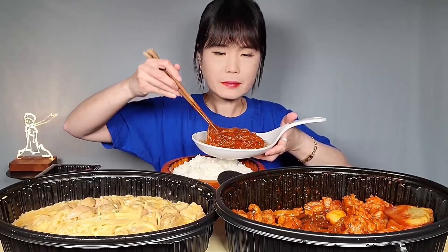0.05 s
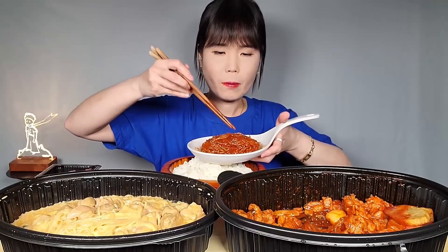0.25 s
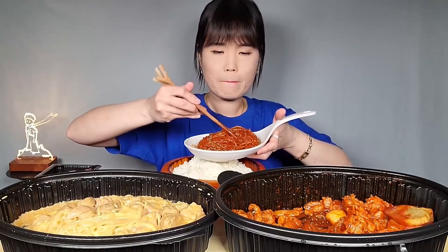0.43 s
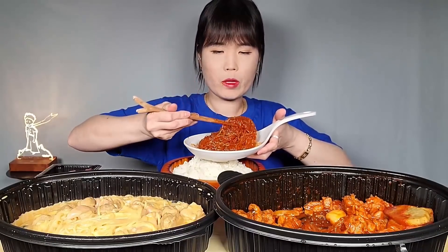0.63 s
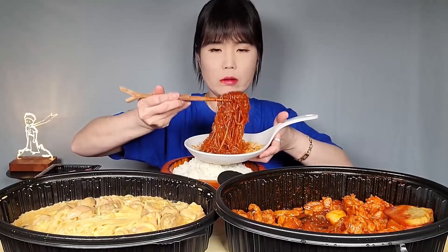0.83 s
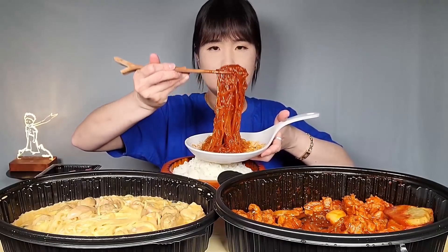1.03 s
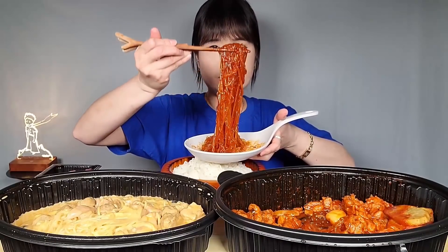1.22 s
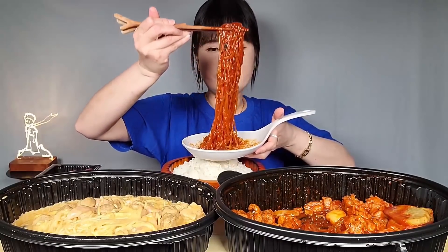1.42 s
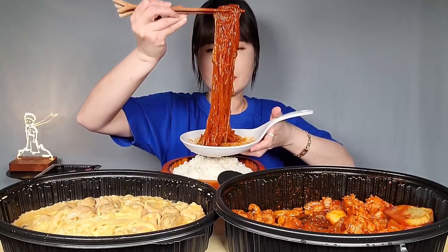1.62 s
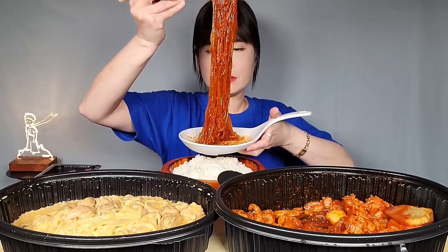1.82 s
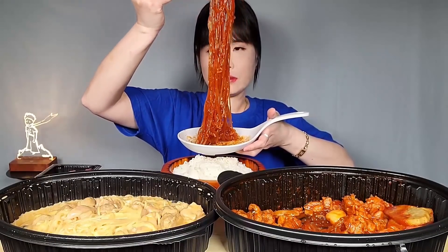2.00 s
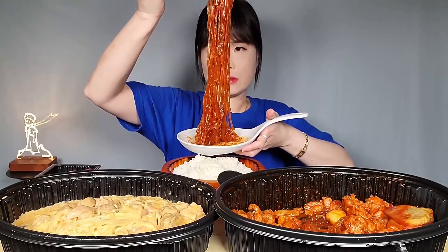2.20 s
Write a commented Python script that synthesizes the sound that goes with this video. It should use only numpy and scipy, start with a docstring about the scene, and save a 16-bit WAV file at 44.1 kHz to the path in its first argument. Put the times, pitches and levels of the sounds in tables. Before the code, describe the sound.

Saucy noodles squelch and crackle wetly as chopsticks gather and lift them, close up.

```python
"""Lifting saucy noodles

Chopsticks gather noodles in a ceramic spoon and lift them, close to a stereo microphone in a quiet room.
Sauce films burst in tiny pops over a fine crackle; air pockets plip open as the strands pull apart.
The sticks nudge the food and tick once on the spoon. A sleeve rustles and the microphone stand sways."""
import sys
import numpy as np
from scipy import signal
from scipy.fft import rfft, irfft
from scipy.io import wavfile
from scipy.ndimage import uniform_filter1d

SR = 44100
rng = np.random.default_rng(int(sys.argv[2]) if len(sys.argv) > 2 else 0)


def pcm_store(signal):
    """Save signal as 16-bit PCM."""
    levels = np.round(np.clip(np.atleast_2d(signal), -1, 1) * 32767)
    wavfile.write(sys.argv[1], SR, levels.astype(np.int16).T)


N = 103635


def amp(db):
    return 10 ** (np.asarray(db) / 20)


def unit_rms(x):
    return x / np.sqrt(np.mean(x ** 2) + 1e-20)


def fader(table, column=1):
    """A gain for every sample, gliding between timed levels in dB."""
    rows = np.array(table)
    return amp(np.interp(np.arange(N) / SR, rows[:, 0], rows[:, column]))


def at_freq(points, hz):
    """Reads a table along a log-frequency axis."""
    freqs, values = np.transpose(points)
    return np.interp(np.log(hz + 1), np.log(freqs), values)


def add(mix, start_s, sound):
    """Mixes a sound in at its cue."""
    part = mix[..., max(round(start_s * SR), 0):][..., :sound.shape[-1]]
    part += sound[..., :part.shape[-1]]


def eq(x, gain_db):
    """Filters by a function that gives dB for each frequency."""
    size = 2 * x.shape[-1]
    hz = np.fft.rfftfreq(size, 1 / SR) + 1
    return irfft(rfft(x, size) * amp(gain_db(hz)))[..., :size // 2]


def bell(x, centre_hz, db_per_oct2):
    """Keeps a bell-shaped band, at unit RMS."""
    return unit_rms(eq(x, lambda hz: -db_per_oct2 * np.log2(hz / centre_hz) ** 2))


def delayed(x, lag_s):
    """Delays with sub-sample precision."""
    size = 2 * len(x)
    hz = np.fft.rfftfreq(size, 1 / SR)
    return irfft(rfft(x, size) * np.exp(-2j * np.pi * hz * lag_s))[:len(x)]


# Colour of the room tone and hiss: freq_hz, gain_db
ROOM_TONE_EQ = [(60, -3.5), (250, -12), (400, -18), (1600, -28), (7400, -30.5), (10000, -34), (13200, -25),
                (16000, -32)]
def room_tone(level_db=-50):
    """A steady bed of room air and microphone hiss, mostly unrelated between the sides."""
    noise = rng.standard_normal((2, N)) + 0.39 * rng.standard_normal(N)
    return amp(level_db) * unit_rms(eq(noise, lambda hz: at_freq(ROOM_TONE_EQ, hz)))


# Early reflections off the dishes and table: freq_hz, t60_s
TABLE_DECAY = [(500, 0.068), (12000, 0.0085)]
# The room's tail: freq_hz, t60_s
ROOM_DECAY = [(300, 1), (3000, 0.052), (12000, 0.16)]
def reflections(send, size=16384):
    """The table, then the room, answer with diffuse stereo tails that last longest in the lows."""
    wet = np.zeros((2, N))
    for decay, level_db, predelay_s in [(TABLE_DECAY, -8, 0.0005), (ROOM_DECAY, -23, 0.005)]:
        hz, t, noise = signal.stft(rng.standard_normal((2, size)), SR, nperseg=64)
        fade = amp(-60 * t / at_freq(decay, hz)[:, None])
        tail = signal.istft(noise * fade, SR, nperseg=64)[1]
        tail = np.pad(tail / np.linalg.norm(tail[0]), ((0, 0), (round(predelay_s * SR), 0)))
        wet += amp(level_db) * signal.fftconvolve(send[None], tail, axes=1)[:, :N]
    return wet


# Handling rumble in the stand: time_s, sub_level_db, bass_level_db
RUMBLE_LEVELS = [(.25, -62.5, -51.5), (.34, -24.5, -48), (.47, -34.5, -49), (.6, -35.5, -51),
                 (1.1, -39, -60.5), (1.7, -46.5, -62.5), (2.12, -45.5, -43), (2.35, -49, -53)]
def mic_stand(push_s=0.266, sway_hz=14.8, sway_db=-12.5, swell_s=0.215):
    """The movement rocks the stand from side to side; the sway swells and dies over a low rumble."""
    sway, t = np.zeros((2, N)), np.arange(N) / SR
    swell = amp(sway_db) * (t / swell_s * np.exp(1 - t / swell_s)) ** 5
    left = amp(-2.5) * np.sin(2 * np.pi * (sway_hz * t - 0.37))
    right = np.sin(2 * np.pi * sway_hz * t)
    add(sway, push_s, swell * np.array([left, right]))
    sub = bell(rng.standard_normal((2, N)), centre_hz=23, db_per_oct2=23)
    bass = bell(rng.standard_normal((2, N)) + rng.standard_normal(N), centre_hz=51, db_per_oct2=17)
    return sway + sub * fader(RUMBLE_LEVELS) + bass * fader(RUMBLE_LEVELS, column=2)


# Swell of the sleeve's rustle: time_s, level_db
SLEEVE_LEVELS = [(.7, -63.5), (.85, -49), (1.3, -51.5), (2.05, -68.5)]
# Colour of the cloth: freq_hz, gain_db
CLOTH_EQ = [(250, 2.5), (480, -12), (850, -3.5), (1700, -13), (12000, -23)]
def sleeve():
    """Cloth rustles softly while the arm lifts the noodles."""
    noise = rng.standard_normal(N) + 0.87 * rng.standard_normal((2, N))
    return fader(SLEEVE_LEVELS) * unit_rms(eq(noise, lambda hz: at_freq(CLOTH_EQ, hz)))


def snap(tilt_db_per_oct=0, decay_s=0.0008, low_hz=1900, high_hz=14700, size=512):
    """The broad crack of a tearing film or a stick's tap: a very short burst of noise."""
    def tone_db(hz):
        tilt = tilt_db_per_oct * np.log2((hz + 400) / 5900)
        return tilt - 10 * np.log10((1 + (hz / high_hz) ** 8) * (1 + (low_hz / hz) ** 4))
    t = np.arange(size) / SR
    burst = rng.standard_normal(size) * np.exp(-t / decay_s)
    return eq(burst / np.linalg.norm(burst), tone_db)


# Soft nudges of the sticks in the food: start_s, length_s, level_db, centre_hz
STICK_NUDGES = [(0, 0.0084, -41, 740), (0.047, 0.034, -48.5, 740), (0.13, 0.012, -36, 1190),
                (0.1823, 0.0064, -39.5, 840), (0.193, 0.013, -37, 810), (0.7442, 0.008, -39, 780)]
# Ring of the ceramic spoon: pitch_hz, relative_level_db, t60_s
SPOON_MODES = [(2140, -14.5, .011), (3360, -5, 0.02), (4800, 1.5, 0.0093), (6150, 4.5, 0.0068),
               (7520, 7, 0.0054)]
def chopsticks(tick_s=0.2151, snap_db=-6, ring_db=-18.5, size=4096):
    """The sticks scuff dully in the food and strike the spoon once, ringing its modes."""
    out, t = np.zeros(N), np.arange(size) / SR
    for start_s, length_s, level_db, centre_hz in STICK_NUDGES:
        scuff = eq(rng.standard_normal(size), lambda hz: -11.5 * np.abs(np.log2(hz / centre_hz)))
        age = 2 * t / length_s  # the scuff peaks at age 1
        add(out, start_s, amp(level_db) * unit_rms(scuff) * (age * np.exp(1 - age)) ** 2)
    add(out, tick_s, amp(snap_db) * snap())
    for pitch_hz, mode_db, t60_s in SPOON_MODES:
        mode = np.sin(2 * np.pi * (pitch_hz * t + rng.random()))
        add(out, tick_s, amp(ring_db + mode_db - 60 * t / t60_s) * mode)
    return out


# Plips between the strands: start_s, level_db
AIR_POCKETS = [(0.7468, -21), (0.8132, -32), (.939, -34.5), (0.9907, -30.5), (1.135, -31), (1.188, -31),
               (1.233, -35), (1.5261, -32), (1.6295, -36.5)]
def air_pockets(pitch_hz=1048, glide_hz_per_s=5800, attack_s=0.00063, decay_s=0.0046, size=2048):
    """Each air pocket rings and rises in pitch as it opens."""
    out, t = np.zeros(N), np.arange(size) / SR
    envelope = (1 - np.exp(-t / attack_s)) * np.exp(-t / decay_s)
    for start_s, level_db in AIR_POCKETS:
        start_hz = pitch_hz * (1 + 0.015 * rng.standard_normal())
        turns = start_hz * t + glide_hz_per_s * t ** 2 / 2
        add(out, start_s, amp(level_db) * envelope * np.sin(2 * np.pi * turns))
    return out


def cavity_ring(pitch_hz, decay_ms, attack_cycles=0.33, size=512):
    """A tiny cavity swells softly and rings for a few cycles."""
    t = np.arange(size) / SR
    attack = (1 - np.exp(-pitch_hz * t / attack_cycles)) ** 2
    return np.sin(2 * np.pi * pitch_hz * t) * attack * np.exp(-1000 * t / decay_ms)


def in_spoon(burst, echo_s=0.00045, echo_db=-6, pad=64):
    """Puts a burst at a random spot: the wall's echo hollows it, and the sides differ slightly in time."""
    left_lag_s = rng.normal(8e-6, 12e-6)
    direct = np.pad(burst, pad)
    echo = amp(echo_db) * delayed(direct, echo_s * rng.uniform(0.49, 2.006))
    hollow = (direct + echo) / np.hypot(1, amp(echo_db))
    return np.array([delayed(hollow, left_lag_s), hollow])[:, pad - 8:]


def crackle(effort, peak_per_s, low_hz, high_hz, ring_cycles, spread_db, tilt_db_per_oct):
    """Small films of random size burst in clumps; with less effort they grow both fewer and softer."""
    out, level = np.zeros((2, N)), fader(effort)
    pitches = np.geomspace(low_hz, high_hz, 32)
    density = np.sqrt(level / level.max())
    flutter = uniform_filter1d(rng.standard_normal(N), round(0.003 * SR))  # clumps of about 3 ms
    clumps = np.exp(0.8 * unit_rms(flutter))
    chance = density * clumps / clumps.mean() * peak_per_s / len(pitches) / SR
    for hz in pitches:
        sizes = amp(spread_db * np.minimum(rng.exponential(1, N), 2.5)) * rng.choice([-1, 1], N)
        triggers = (rng.random(N) < chance) / np.sqrt(density)  # even power until the fader
        bursts = amp(tilt_db_per_oct * np.log2(hz / low_hz)) * sizes * triggers
        ring = cavity_ring(hz, decay_ms=1000 * ring_cycles / hz)
        grain = ring / np.linalg.norm(ring) + amp(-9) * snap()
        out += signal.oaconvolve(bursts[None], in_spoon(grain), axes=1)[:, :N]
    return level * unit_rms(out)


# Fine crackle, following how hard the noodles are worked: time_s, level_db
STRAND_EFFORT = [(0, -49.5), (.08, -56.5), (.26, -48.5), (.375, -57.5), (.41, -41.5), (.47, -36.5),
                 (.525, -45.5), (.595, -41.5), (.645, -36), (.715, -40), (.785, -42.5), (1.02, -48.5),
                 (1.3, -53), (1.46, -53), (2.35, -62)]
# Moist squelch as the mass is squeezed and tears loose: time_s, level_db
SQUEEZE_EFFORT = [(.39, -59), (.47, -37.5), (.51, -44), (.595, -43), (.655, -40), (.79, -49), (.94, -50),
                  (1.15, -60), (1.8, -68)]
def noodles():
    """The strands crackle finely above the lower, bubbly squelch of the squeezed mass."""
    fine = crackle(STRAND_EFFORT, peak_per_s=1200, low_hz=6370, high_hz=14500,
                   ring_cycles=2.3, spread_db=6.5, tilt_db_per_oct=-2.3)
    moist = crackle(SQUEEZE_EFFORT, peak_per_s=1600, low_hz=1274, high_hz=4670,
                    ring_cycles=1.4, spread_db=9, tilt_db_per_oct=3.5)
    return fine + moist


# Bursting sauce films: start_s, level_db, pitch_hz, decay_ms
SAUCE_POPS = [(0.0453, -12, 8100, 0.26), (0.261, -10, 9900, 0.09), (0.436, -8.5, 6950, 0.3),
              (0.45, -6.5, 10700, 0.17), (0.4693, -6.5, 4380, 2.7), (0.4687, -18.5, 2230, 2.5),
              (0.4812, -19.5, 3640, 1.4), (0.4924, -1.5, 6900, 0.15), (0.509, -13.5, 3850, 0.21),
              (0.5622, -9, 7380, 0.73), (0.571, -2.5, 8360, 0.11), (0.5792, -11.5, 7900, 0.29),
              (0.6174, -8, 8750, 0.24), (0.6245, -9, 7280, 0.3), (0.63, -14.5, 3880, 0.94),
              (0.6389, -7, 7060, 0.27), (0.6467, -15, 2070, 0.69), (0.6581, -19, 4000, 0.67),
              (0.665, -20.5, 3970, 1.4), (0.706, -10.5, 13200, 0.37), (0.7079, -17, 4320, 0.84),
              (0.7167, -9, 7200, 0.26), (0.8082, -11, 12900, 0.2), (0.855, 1, 6240, 0.3),
              (0.8652, -6, 8600, 0.2), (0.877, -11, 9570, .2), (0.908, -1, 12300, 0.098),
              (0.939, -5.5, 6940, 0.24), (0.9378, -23, 3230, 1.9), (0.98, -5.5, 8340, 0.27),
              (0.9918, -18.5, 3600, 3), (1.007, -11.5, 8240, 0.52), (1.0328, -11, 8400, 0.19),
              (1.04, -14, 4750, 0.3), (1.1062, -14, 6800, 0.28), (1.134, -18.5, 4860, 0.33),
              (1.189, -10, 4760, 0.34), (1.2332, -7.5, 7800, 0.12), (1.254, -24, 11000, 0.76),
              (1.292, -23.5, 5100, 0.49), (1.3115, -14, 8600, 0.14), (1.4022, -13.5, 9250, 0.19),
              (1.5207, -12.5, 6700, 0.3), (1.5255, -11.5, 5200, 0.14), (1.5794, -13, 4170, 0.21),
              (1.6244, -14.5, 11400, 0.27), (1.6272, -14, 4750, 0.51), (1.664, -11, 4950, 0.31),
              (1.6793, -23.5, 2860, 0.56), (1.733, -5.5, 14000, 0.085), (1.7744, -13, 13500, 0.083),
              (1.7918, -9, 11350, 0.11), (1.8418, -13, 13300, 0.41), (1.8554, -21, 7450, 0.82),
              (1.9075, -11, 7960, 0.9), (1.9078, -7, 13800, .1), (1.9384, -20, 4800, 0.55),
              (1.964, -11.5, 6720, 0.21), (2.0228, -29, 5000, 0.56), (2.0401, -14, 7900, 0.21),
              (2.0947, -14, 14000, 0.25), (2.1853, -14.5, 13000, 0.15), (2.2155, -12.5, 11400, 0.22)]
def sauce_pops(snap_db=-13.5, overtone_db=-3.5, hollow_below_hz=5700):
    """Films snap and their cavities ring; small ones snap brighter, large ones add a hollow overtone."""
    out = np.zeros((2, N))
    for start_s, level_db, pitch_hz, decay_ms in SAUCE_POPS:
        crack = amp(snap_db) * snap(tilt_db_per_oct=4.5 * np.log2(pitch_hz / 6000))
        overtone_hz = 1.51 * pitch_hz * (1 + 0.046 * rng.standard_normal())
        overtone_gain = amp(overtone_db) / (1 + (pitch_hz / hollow_below_hz) ** 8)
        overtone = overtone_gain * cavity_ring(overtone_hz, decay_ms=0.53)
        pop = cavity_ring(pitch_hz, decay_ms) + overtone + crack
        add(out, start_s, amp(level_db) * in_spoon(pop))
    return out


def scene():
    """Food and sticks feed the reflections, the background stays dry, and the mix leans a little right."""
    food = sauce_pops() + noodles() + air_pockets() + chopsticks()
    mix = food + reflections(food.mean(axis=0)) + sleeve() + mic_stand() + room_tone()
    return mix * amp([[-1.65], [-0.41]])


def record(dry, cutoff_hz=16300):
    """The recorder's band limit cuts the very top."""
    lowpass = signal.firwin(255, cutoff_hz, window=("kaiser", 9), fs=SR)
    return signal.oaconvolve(dry, lowpass[None], "same")


dry = scene()
out = record(dry)
pcm_store(out)
```